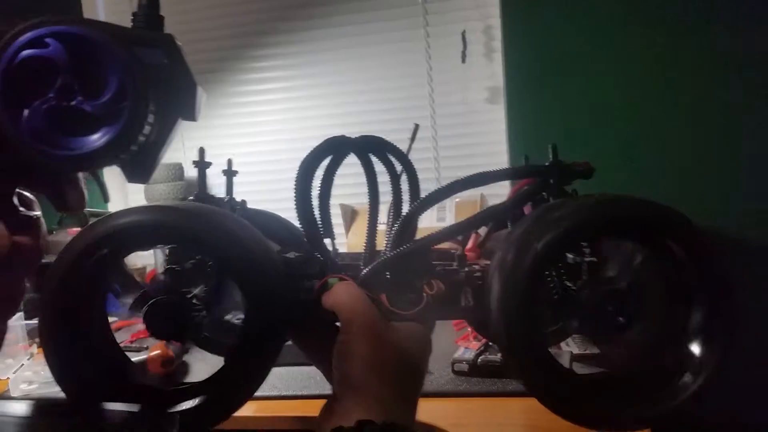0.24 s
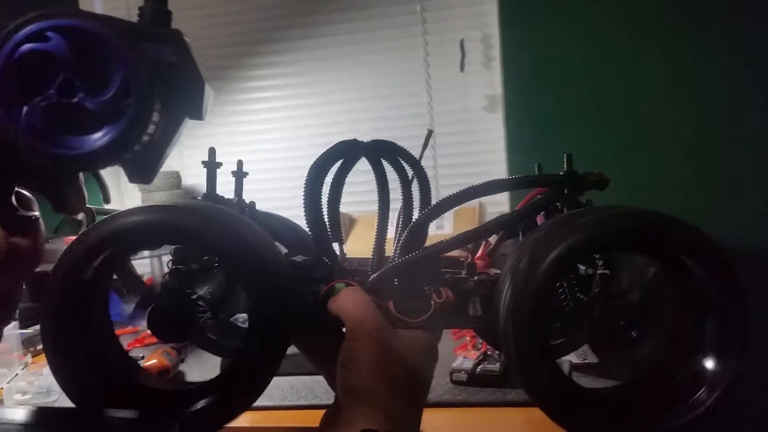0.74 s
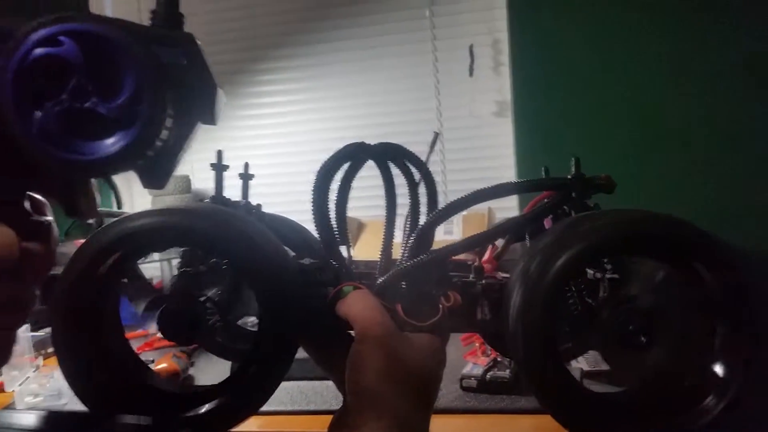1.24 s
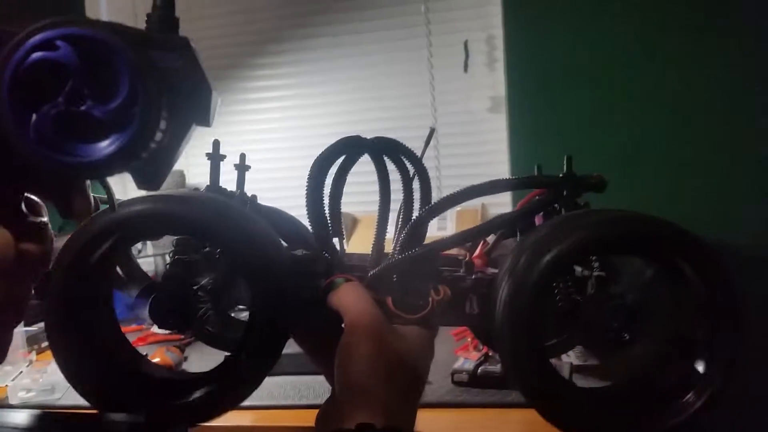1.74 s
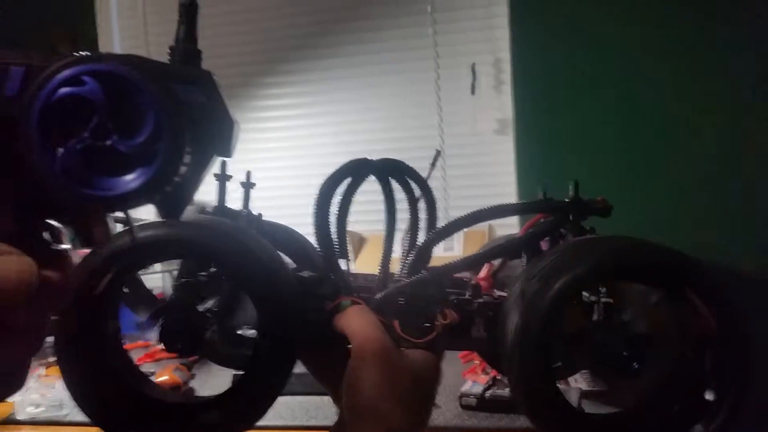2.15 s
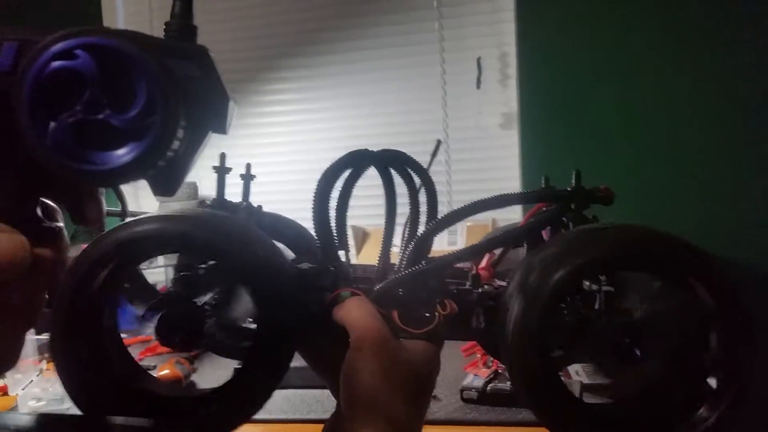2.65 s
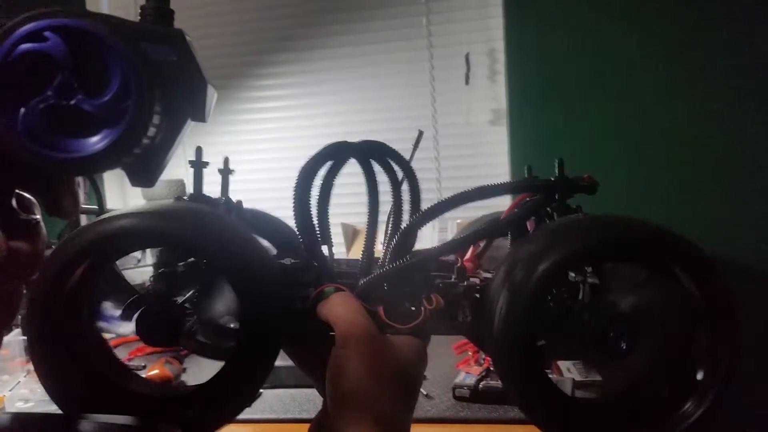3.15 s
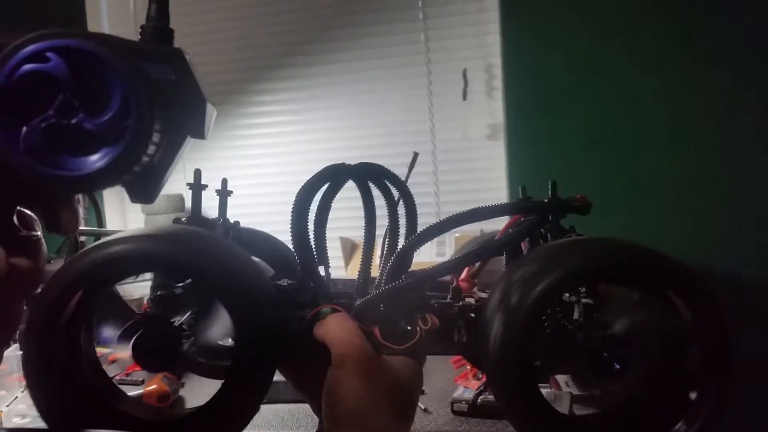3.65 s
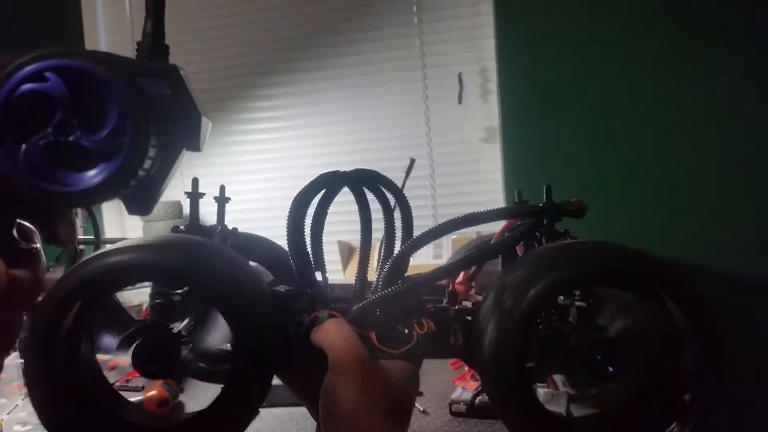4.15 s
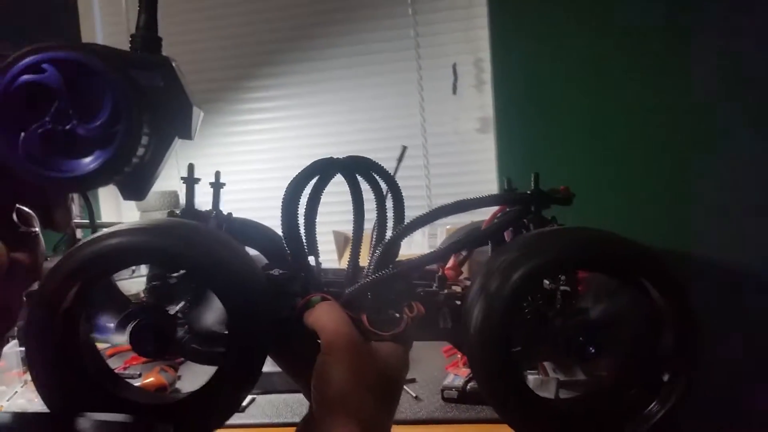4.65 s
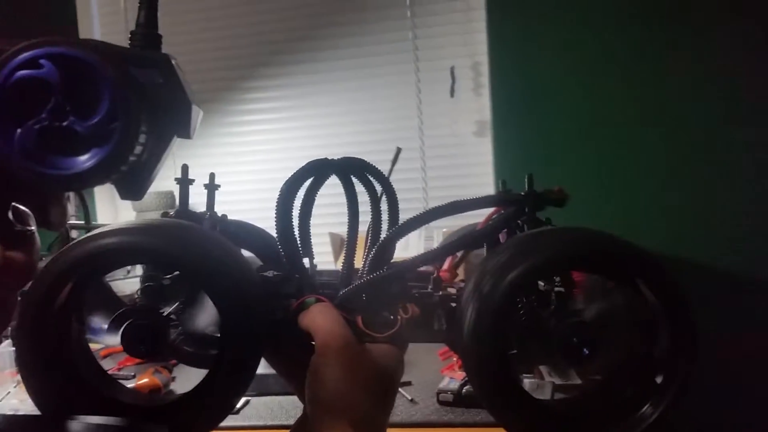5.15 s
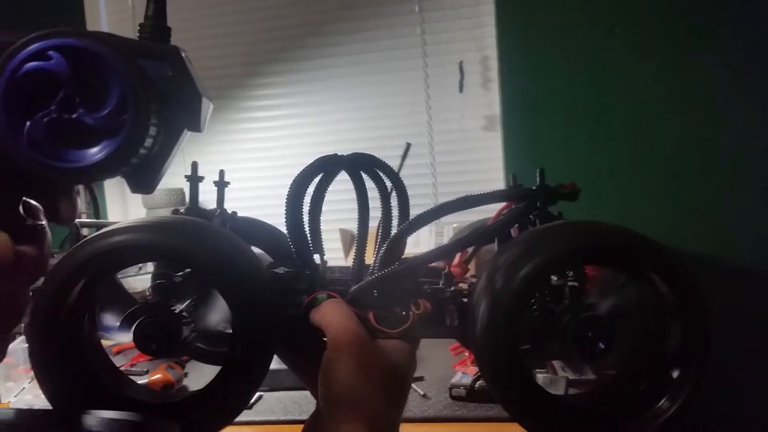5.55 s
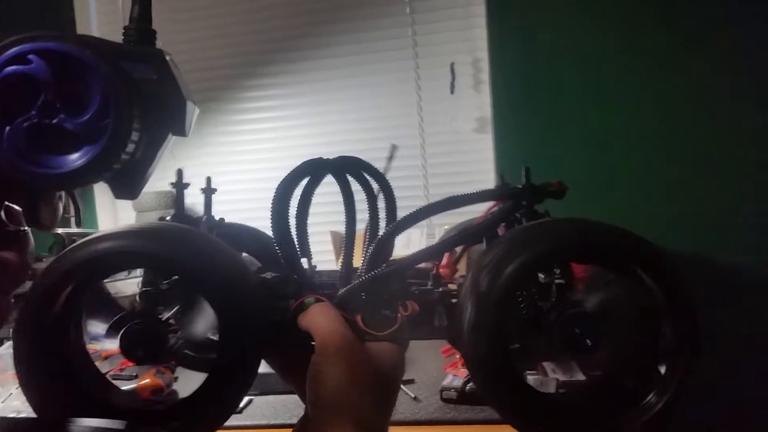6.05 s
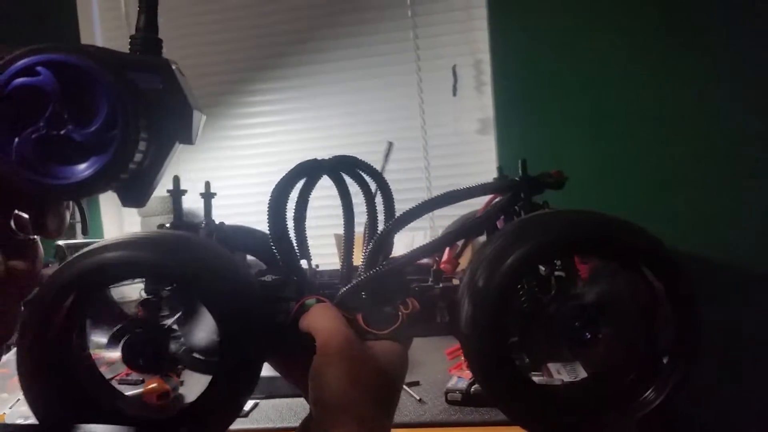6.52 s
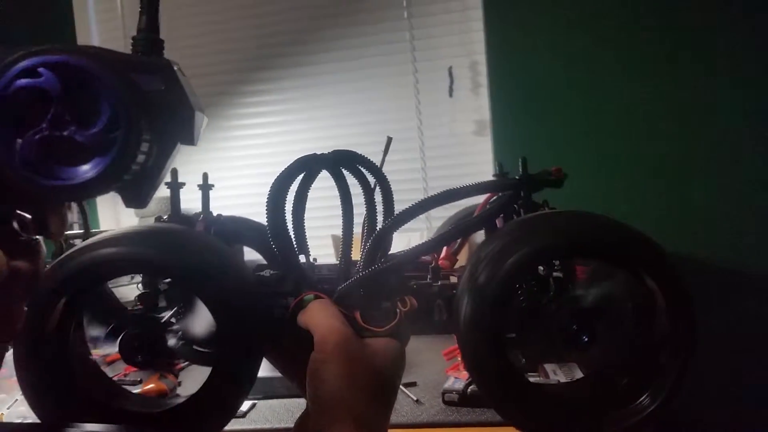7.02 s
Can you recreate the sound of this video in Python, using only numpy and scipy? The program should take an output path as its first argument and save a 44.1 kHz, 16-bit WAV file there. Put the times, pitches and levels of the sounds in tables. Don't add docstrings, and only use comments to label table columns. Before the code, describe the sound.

A model truck held in the air spins its wheels close by. Its gear whine starts low and rough inside a grainy rattle, then climbs continuously for seven seconds, growing louder, brighter and more piercing. Soft low thumps from the hand touching the microphone come mostly in the first half, stronger on the right. Faint low wind and a thin high fan whistle sit beneath, in a small garage with short reflections.

```python
import sys
import numpy as np
from scipy import signal
from scipy.io import wavfile
from scipy.ndimage import uniform_filter1d, map_coordinates

SR = 44100
rng = np.random.default_rng(int(sys.argv[2]) if len(sys.argv) > 2 else 0)


def nominal_scale(level):
    x = np.asarray(level, float) / 20
    return 10 ** x


def generate_wav(sig):
    pcm = np.round(np.clip(np.atleast_2d(sig).T, -1, 1) * 32767).astype(np.int16)
    wavfile.write(sys.argv[1], SR, pcm)


N = 321048
SPUR_TEETH, AXLE_TEETH = 58, 13


def evened(x):
    return x / np.sqrt(np.mean(x ** 2) + 1e-20)


def curve(rows):
    times, *columns = np.transpose(rows)
    return [np.interp(np.arange(N) / SR, times, column) for column in columns]


def read(rows, hz):
    table_hz, *columns = np.transpose(rows)
    return np.array([np.interp(np.log(hz + 1), np.log(table_hz + 1), column) for column in columns])


def drift(turns, per_turn):
    knots = rng.standard_normal(40000)
    return evened(map_coordinates(knots, [turns * per_turn + 4], order=3))


def wobble(turns, once, twice, thrice):
    angle = 2 * np.pi * turns
    return once * np.cos(angle) + twice * np.cos(2 * angle + 0.9) + thrice * np.cos(3 * angle + 1.62)


# (time [s], tooth rate [Hz])
TOOTH_RATE = [(0.0, 860), (0.15, 913), (0.3, 991), (0.45, 1076), (0.6, 1134), (0.75, 1175), (0.9, 1223),
              (1.05, 1275), (1.2, 1323), (1.35, 1366), (1.5, 1406), (1.65, 1446), (1.8, 1483), (1.95, 1522),
              (2.1, 1556), (2.25, 1590), (2.4, 1618), (2.55, 1655), (2.7, 1711), (2.85, 1807), (3.0, 1888),
              (3.15, 1976), (3.3, 2069), (3.45, 2169), (3.6, 2289), (3.75, 2421), (3.9, 2533), (4.05, 2670),
              (4.2, 2807), (4.35, 2947), (4.5, 3100), (4.65, 3232), (4.8, 3395), (4.95, 3570), (5.1, 3764),
              (5.25, 3991), (5.4, 4209), (5.55, 4452), (5.7, 4682), (5.85, 4908), (6.0, 5180), (6.15, 5484),
              (6.3, 5768), (6.45, 6136), (6.6, 6501), (6.75, 6819), (6.9, 7171), (7.05, 7516), (7.2, 7803),
              (7.28, 7885)]


def shaft_turns():
    tooth_hz = uniform_filter1d(curve(TOOTH_RATE)[0], 4000)
    return tooth_hz, np.cumsum(tooth_hz) / SR / SPUR_TEETH


# (time [s], drive level [dB],
# whine [dB over rattle], second harmonic [dB over rattle], third and fourth [dB over rattle])
DRIVE_LEVELS = [(0.0, -34.5, -9, -9, -7.5), (0.17, -34, -14, -11.5, -13), (0.34, -33, -14, -8.5, -11.5),
                (0.51, -32, -13, -13, -17), (0.68, -31, -10.5, -13, -19), (0.85, -30.5, -5, -8, -16),
                (1.02, -29.5, -11, -7.5, -17), (1.19, -29.5, -4, -9.5, -16.5),
                (1.36, -29.5, -2, -10.5, -16), (1.53, -29.5, -4.5, -12.0, -18.5), (1.7, -30, -9, -10, -26),
                (1.87, -28.5, -5, -11.5, -18.5), (2.04, -29.5, -6.5, -11, -20.5),
                (2.21, -28.5, -9, -15, -18), (2.38, -29.0, -7.5, -16, -21.5), (2.55, -27.5, -8, -19, -13.5),
                (2.72, -25.5, -8.5, -19, -14), (2.89, -26.0, -6.5, -14, -15), (3.06, -24.5, -7.5, -16, -16),
                (3.23, -24, -7, -12, -13), (3.4, -24, -7.5, -15, -12), (3.57, -23.5, -10, -14, -12),
                (3.74, -23.5, -9, -18, -8), (3.91, -23, -4.5, -16.0, -11), (4.08, -22.5, -8.5, -18, -12),
                (4.25, -22.5, -7, -19.5, -12), (4.42, -24, -3, -12.5, -15), (4.59, -23.5, -2.5, -10.5, -16),
                (4.76, -23.0, -10, -6.5, -13), (4.93, -22.5, -10, -4.5, -20.5), (5.1, -23, -2.5, -5, -8),
                (5.27, -22, -3, -6.5, -9.0), (5.44, -21.5, -4.5, -7, -12), (5.61, -21.0, -6, -5, -13),
                (5.78, -20.5, -7, -5.5, -8), (5.95, -20, -4, -7, -6.5), (6.12, -21.5, -5.0, -4, -11.5),
                (6.29, -21.5, -3, -5, -11.5), (6.46, -20, -2, -6, -12.0), (6.63, -22, -2, -8, -12.5),
                (6.8, -20, -5, -12, -14.0), (6.97, -19.5, -5, -12, -15.0), (7.14, -20, -4.5, -16, -16.0),
                (7.28, -19.5, -5.5, -21.0, -17.0)]


def whine(tooth_hz, turns):
    _, first_db, second_db, upper_db = curve(DRIVE_LEVELS)
    timing = wobble(turns + 0.21, once=0.96, twice=0.51, thrice=0.28)
    timing += 0.65 * drift(turns, 1.5) + 0.54 * drift(turns, 5.0)
    pressure_db = wobble(turns, once=3.0, twice=2.5, thrice=0.6) + 2.5 * drift(turns, 2.5)
    mesh_phase = 2 * np.pi * SPUR_TEETH * turns + timing
    out = np.zeros(N)
    for k, db in enumerate([first_db, second_db, upper_db, upper_db - 5.5], 1):
        audible = k * tooth_hz < 0.45 * SR
        level = nominal_scale(db + 0.63 * drift(turns, 1.8))
        out += audible * level * np.cos(k * mesh_phase)
    return np.sqrt(2) * out * evened(nominal_scale(pressure_db))


def rattle(turns):
    shared, own = rng.standard_normal(N), rng.standard_normal((2, N))
    share = 0.45
    throb_db = wobble(turns + 0.14, once=0.53, twice=1.25, thrice=0.94)
    throb_db += 0.67 * drift(turns, 4.0) + 0.58 * drift(turns, 25.0) + 0.31 * drift(turns, 0.3)
    noise = np.sqrt(share) * shared + np.sqrt(1 - share) * own
    return evened(noise * nominal_scale(throb_db))


def order_line(turns, order, db, unsteady_db):
    phase = 2 * np.pi * (order * turns + rng.random()) + 0.4 * drift(turns, 0.2)
    return np.sqrt(2) * nominal_scale(db + unsteady_db * drift(turns, 0.08)) * np.cos(phase)


# (time [s], axle gear [dB over rattle],
# its second harmonic [dB over rattle], flaw lines [dB over rattle])
HUM_LEVELS = [(0, -21, -26, -4), (.8, -18, -29, -10), (1.7, -18.5, -26, -7), (2.3, -25, -27, -9),
              (2.9, -15, -25, -8), (3.5, -22.5, -26.5, -9), (4.1, -19.5, -30, -15.5),
              (4.6, -21.5, -17, -7.5), (5, -20, -28, -4.5), (5.5, -13, -21.5, -7.5), (6, -15.5, -18, -8.5),
              (6.4, -13, -31, -5.5), (6.7, -17, -23, -1), (6.95, -15, -25, 0.5), (7.05, -28, -16, -0.5),
              (7.28, -21, -23, 2)]
FLAW_CYCLES = [4 / 3, 5, 8, 9, 10, 12, 14, 16, 18, 20, 22, 28, 29]
FLAW_LEVELS = [-24, -29.5, -22.5, -28, -20.5, -19.5, -20, -27, -25.5, -25.5, -26, -24, -31]


def shaft_hum(turns):
    axle_db, second_db, flaws_db = curve(HUM_LEVELS)
    axle = sum(order_line(turns, order=k * AXLE_TEETH, db=db, unsteady_db=1.5)
               for k, db in enumerate([axle_db, second_db, second_db - 5.0], 1))
    flaws = sum(order_line(turns, order=order, db=db + flaws_db, unsteady_db=2.5)
                for order, db in zip(FLAW_CYCLES, FLAW_LEVELS))
    comb = sum(order_line(turns, order=order, db=-36 + flaws_db, unsteady_db=3.5)
               for order in range(2, 48))
    return axle + flaws + comb


def garage(x, wet_db, t60):
    taps = np.zeros((2, 8000))
    at = np.arange(60, 7980, 20) + rng.integers(0, 20, (2, 396))
    fading = nominal_scale(-60 * at / SR / t60)
    np.put_along_axis(taps, at, rng.choice([-1., 1.], at.shape) * fading, 1)
    taps *= nominal_scale(wet_db) / np.linalg.norm(taps, axis=1, keepdims=True)
    taps[0, 10] = taps[1, 0] = 1
    return signal.fftconvolve(x, taps / np.linalg.norm(taps[0]), axes=1)[:, :N]


# (frequency [Hz], left slow [dB], left fast [dB],
# right slow [dB], right fast [dB])
BODY_COLOUR = [(264, -7.5, -11.5, -18, -9.5), (400, -7, -14.5, -12, -13.5), (615, -9, -12, -11, -10.5),
               (926, -2.5, -16, 0.4, -7.5), (1440, 2, -6, 6, -1.6), (2160, 2.5, -10, 10.5, 4),
               (2720, 4.3, 0.5, 11.5, 6), (4000, 5.8, -2.5, 10.5, 6), (5200, 4, 1.5, 6, 6),
               (7300, 13, 4.5, 10, 5.5), (9340, 9, 7, 1, 2), (11250, 11, 12.5, -2.5, 8),
               (13070, 7, 12.5, 3, 3), (16700, 12.5, 4.5, -22, -5)]
# (frequency [Hz], width [Hz], left [dB], right [dB])
CHASSIS_RINGS = [(637, 60, -2, 3), (1193, 350, -0.5, 0.5), (1380, 160, -12, 1), (1986, 240, -6, 6),
                 (2597, 220, 1, 2.5), (2855, 85, 1, -1), (3100, 130, -11, 0), (3540, 440, 6, -2),
                 (5600, 410, 8, 3.5), (5560, 160, 4, 6), (6510, 350, -8, 4), (8470, 200, 4, 4.5),
                 (9310, 144, 3.5, 11), (12000, 300, 4, -10.5), (13380, 230, 12, -12)]


def through_chassis(x, tooth_hz):
    slow_hz, fast_hz = 1450, 6420
    hz, t, z = signal.stft(x, SR, nperseg=1024, noverlap=768)
    rate = np.interp(t, np.arange(N) / SR, tooth_hz)
    fast = np.clip(np.log(rate / slow_hz) / np.log(fast_hz / slow_hz), -0.4, 1.2)
    colour_db = read(BODY_COLOUR, hz)[:, :, None]
    slow_db, fast_db = colour_db[::2], colour_db[1::2]
    peaks_db = sum(np.outer(db, 1 / (1 + (2 * (hz - centre) / width) ** 2))
                   for centre, width, *db in CHASSIS_RINGS)
    side_db = np.array([-9.0 + 2.0 * fast, 0 * fast])[:, None]
    gain = nominal_scale(slow_db + fast * (fast_db - slow_db) + peaks_db[..., None] + side_db)
    gain /= np.sqrt((gain ** 2).mean((0, 1)))
    return signal.istft(z * gain, SR, nperseg=1024, noverlap=768)[1][:, :N]


def truck():
    tooth_hz, turns = shaft_turns()
    gears = rattle(turns) + whine(tooth_hz, turns) + shaft_hum(turns)
    heard = through_chassis(garage(gears, wet_db=-4.5, t60=0.18), tooth_hz)
    drive_db = curve(DRIVE_LEVELS)[0]
    return nominal_scale(drive_db + 1.0) * heard


def fan():
    waver = evened(uniform_filter1d(rng.standard_normal(N), 2000))
    left_right_db = np.array([[-55], [-63]])
    return nominal_scale(left_right_db) * np.cos(2 * np.pi * np.cumsum(11700 + 6.6 * waver) / SR)


# (frequency [Hz], density [dB per Hz])
RUMBLE_COLOUR = [(15, -30), (30, 6), (60, 2.5), (110, -13), (200, -10.5), (350, -15), (600, -5),
                 (1200, -44)]
# (time [s], left [dB], right [dB])
RUMBLE_LEVELS = [
    (0, -63, -52.5),
    (.5, -58, -49.5),
    (1.5, -60, -51),
    (2.5, -60, -50),
    (3.5, -62, -52.5),
    (4.5, -61, -51),
    (5.4, -64, -56.5),
    (6, -66, -64),
    (7.28, -67, -60),
]


def rumble():
    hz, _, z = signal.stft(rng.standard_normal((2, N)), SR, nperseg=4096)
    colour = nominal_scale(read(RUMBLE_COLOUR, hz)[0])[:, None]
    low = signal.istft(z * colour, SR, nperseg=4096)[1][:, :N]
    lumps_db = 2.3 * evened(uniform_filter1d(rng.standard_normal((2, N)), 3000))
    return nominal_scale(np.array(curve(RUMBLE_LEVELS)) + lumps_db) * evened(low)


# (time [s], peak level [dB], left minus right [dB],
# pitch [Hz], fading time [s])
HAND_BUMPS = [(0.444, -45, -14.5, 75, 0.015), (0.475, -33.5, -4, 74.5, 0.01),
              (0.502, -37, -11.5, 75, 0.014), (0.566, -38, -16.5, 76, 0.012),
              (0.596, -38, -11.0, 75, 0.013), (0.624, -33.5, -15.0, 75, 0.0097),
              (1.129, -42, -11.0, 75, 0.013), (1.52, -38, -13.5, 75, 0.017), (1.858, -29, -7, 75.4, 0.017),
              (2.071, -26.5, -15.0, 74.5, 0.012), (2.105, -33, -12.5, 75, 0.013),
              (2.223, -34, -10, 75, 0.016), (2.238, -26, -13, 75, 0.02), (2.387, -35, -19.5, 75, 0.017),
              (2.414, -25.5, -16, 75, 0.014), (2.438, -29, -15, 75, 0.014), (2.462, -28, -8, 75, 0.014),
              (2.48, -22, -10, 74.6, 0.013), (2.617, -36, -12, 74, 0.014), (2.967, -31.5, -12, 75, 0.01),
              (3.114, -33.5, -13.5, 75, 0.014), (3.147, -32, -12, 75, 0.01), (3.459, -38, -10.0, 75, 0.017),
              (4.305, -38, -10.0, 75, 0.014), (4.339, -38, -8.5, 75, 0.014),
              (4.729, -38, -19.0, 74.6, 0.014), (4.809, -39, -8, 75, 0.014)]


def bumps():
    out, t = np.zeros((2, N + 8000)), np.arange(8000) / SR
    sag = 0.39 * (1 - np.exp(-t / 0.0026))
    onset = 1 - np.exp(-t / 0.0052)
    for start, db, pan_db, hz, fade in HAND_BUMPS:
        pitch = np.array([[1.52 * hz], [hz]])
        fading = np.clip([[0.5 * fade], [fade]], 0.002, 0.06)
        swing = np.sin(2 * np.pi * (pitch * t + sag)) * onset * np.exp(-t / fading)
        level = nominal_scale(db + 8.0 + np.array([[pan_db + 2.5], [0]]))
        out[:, round(start * SR):][:, :8000] += level * swing
    return out[:, :N]


def scene():
    return truck() + fan() + rumble() + bumps()


def starved(x, below_db):
    hz, _, z = signal.stft(x, SR, nperseg=2048, noverlap=1024)
    power = abs(z[:, :1024]).reshape(2, 128, 8, -1) ** 2
    band_db = 10 * np.log10(power.mean(2) + 1e-20)
    moment_db = 10 * np.log10(power.mean((0, 1, 2)) * 1.4 + 1e-20)
    keep = np.clip((band_db - moment_db + below_db) / 1.5, 0.03, 1)
    keep[:, :16] = 1
    below_edge = hz[:1024, None] < 15760
    z[:, :1024] *= np.repeat(keep, 8, axis=1) * below_edge
    return signal.istft(z, SR, nperseg=2048, noverlap=1024)[1][:, :N]


def low_pass(x):
    return signal.sosfilt(signal.butter(12, 16120, fs=SR, output="sos"), x)


def record(dry):
    mix = starved(dry, below_db=19.0)
    return low_pass(mix)


dry = scene()
out = record(dry)
generate_wav(out)
```